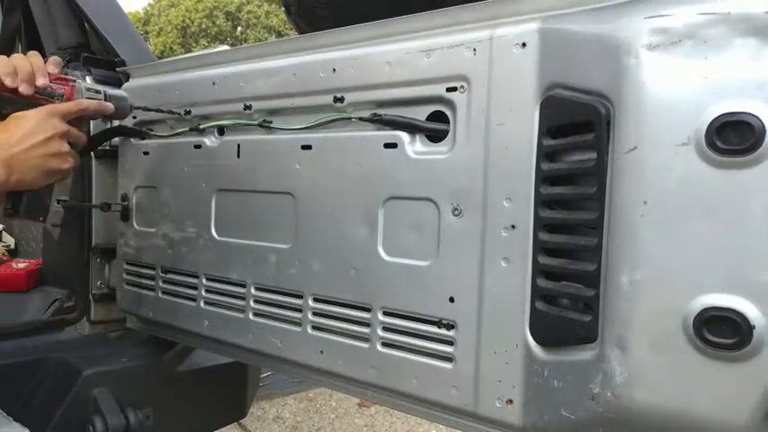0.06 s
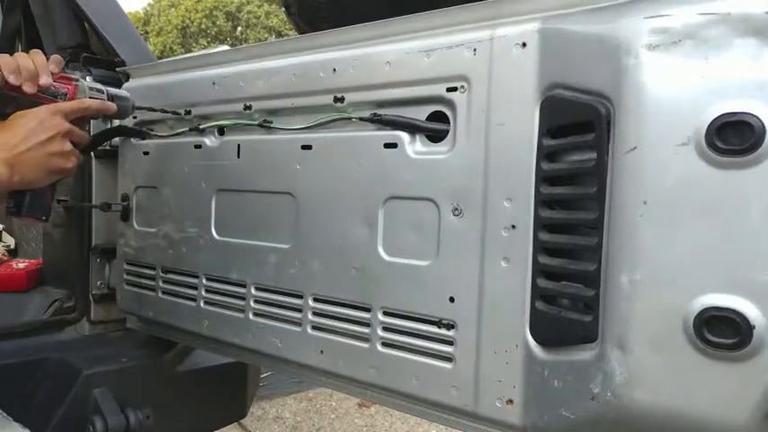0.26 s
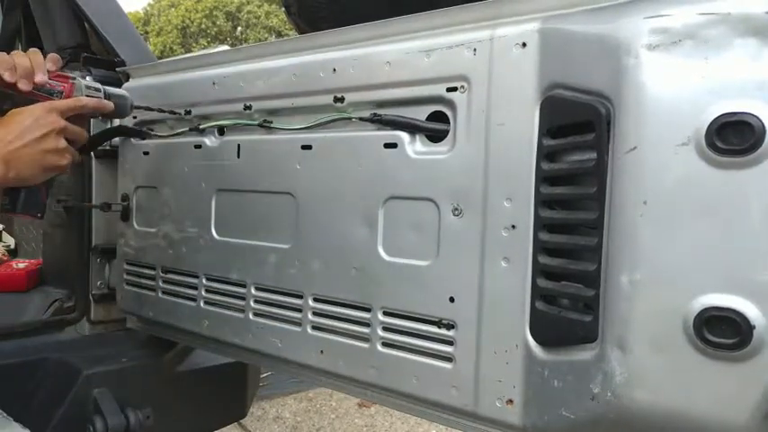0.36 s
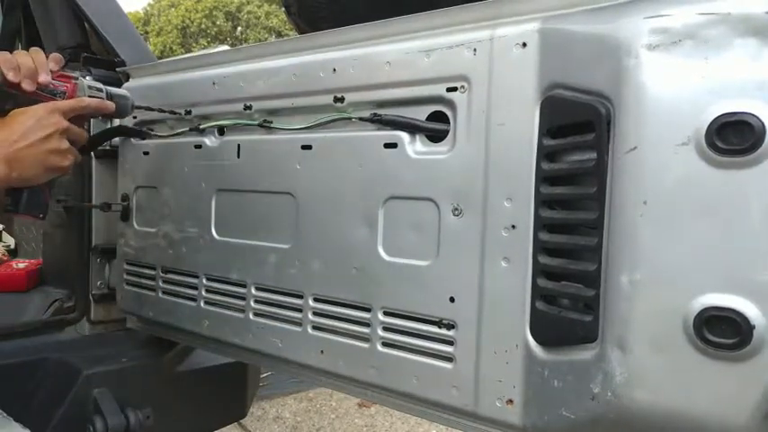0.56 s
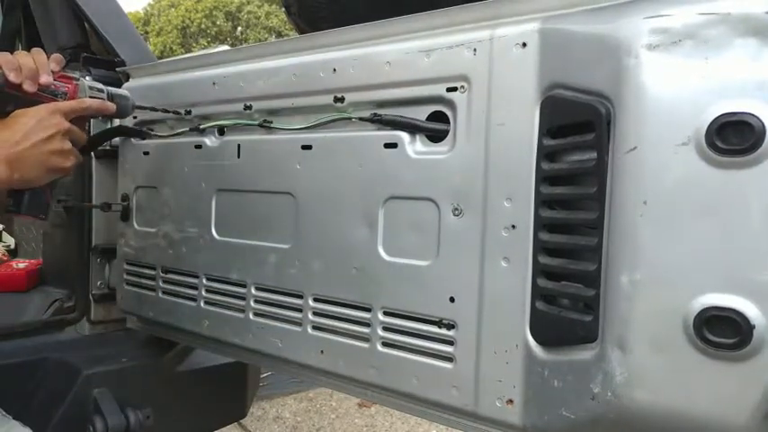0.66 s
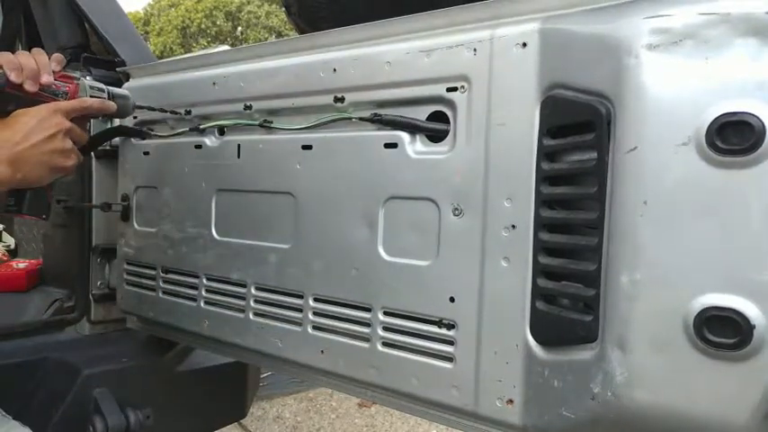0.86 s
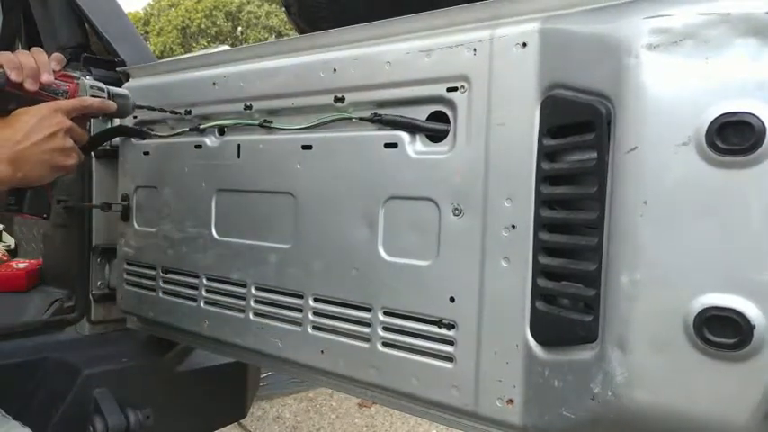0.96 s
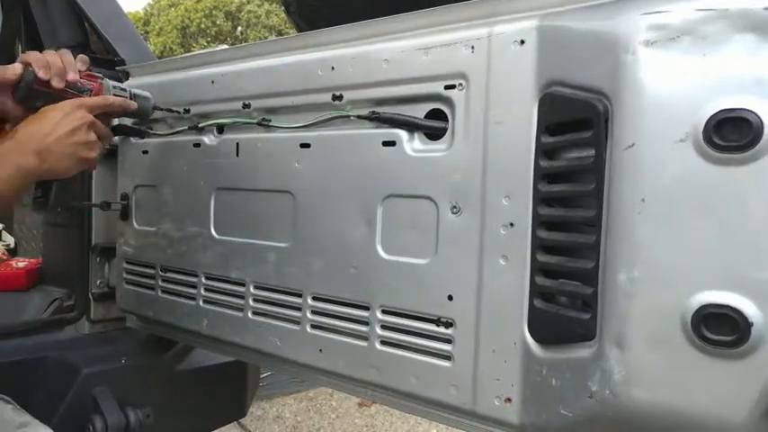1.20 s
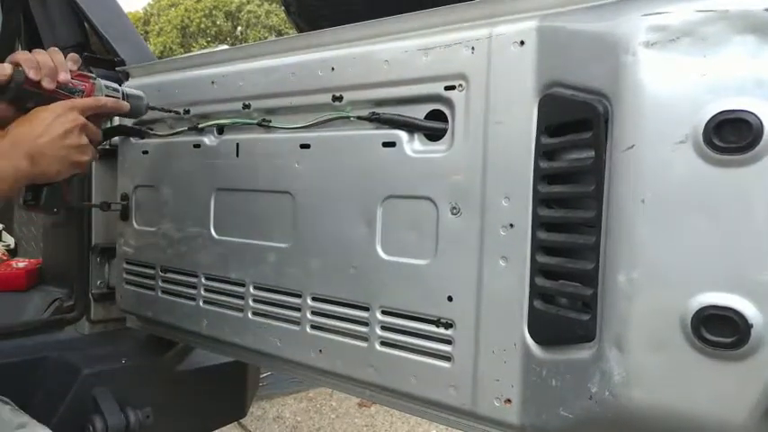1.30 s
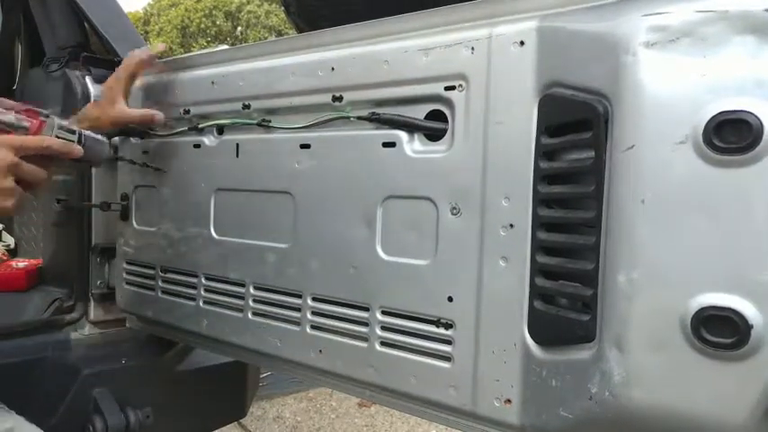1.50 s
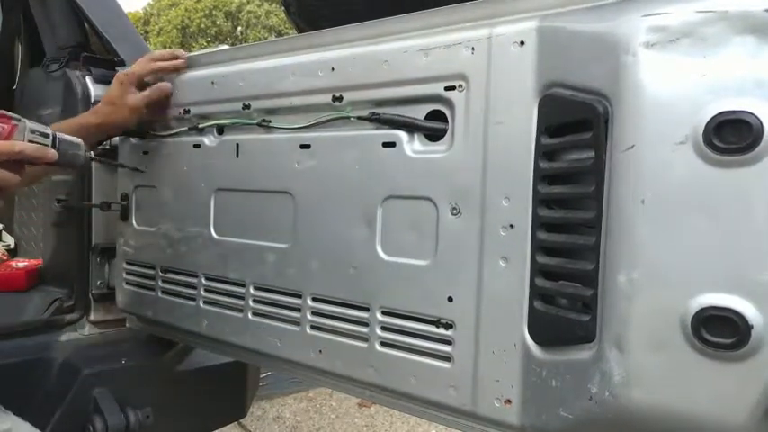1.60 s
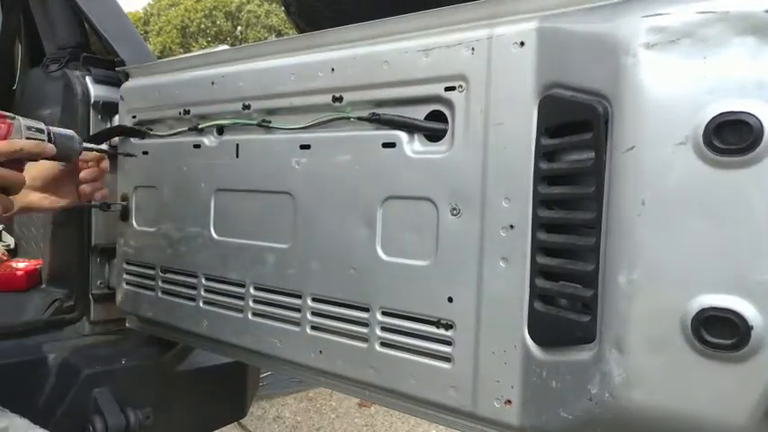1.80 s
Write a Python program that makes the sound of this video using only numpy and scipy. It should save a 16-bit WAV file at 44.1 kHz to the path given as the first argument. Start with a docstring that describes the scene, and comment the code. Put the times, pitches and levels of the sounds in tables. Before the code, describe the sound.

A cordless drill whirs in pulses, its bit scraping and biting harshly through sheet metal.

```python
"""A cordless drill works a small bit into a sheet-metal vehicle panel, over its motor's low rumble and hum.
The trigger pings and the motor whirs in pulses. The bit bites in short bursts, then in longer ones:
each chip it tears off is an impulse that rings the panel's modes. The loudest bites clip harshly,
and the bit squeals as it catches and breaks through. Last come light taps and pings,
and a dull knock as the tool is lowered."""
import sys
import numpy as np
from scipy import signal
from scipy.io import wavfile
from scipy.ndimage import uniform_filter1d

SR = 44100
rng = np.random.default_rng(int(sys.argv[2]) if len(sys.argv) > 2 else 0)


def wav_out(sig):
    """Save sig, one row per channel (or a flat mono array), as 16-bit PCM at SR to the path in sys.argv[1]."""
    wavfile.write(sys.argv[1], SR, np.round(np.clip(np.atleast_2d(sig).T, -1, 1) * 32767).astype(np.int16))


N = 81585
TIME = np.arange(N) / SR


def amp(db):
    """Amplitude ratio of a level in decibels."""
    return 10 ** (np.asarray(db) / 20)


def unit_rms(x):
    """Normalisation to unit mean power."""
    return x / np.sqrt(np.mean(x ** 2) + 1e-20)


def at_hz(points, hz):
    """Interpolation of (frequency, value) rows on a logarithmic frequency axis."""
    frequencies, values = np.transpose(points)
    return np.interp(np.log(hz), np.log(frequencies), values)


def drift(rate_hz):
    """Slow random fluctuation: low-passed noise of unit rms."""
    r = np.exp(-2 * np.pi * rate_hz / SR)
    return unit_rms(signal.lfilter([1], [1, -2 * r, r * r], rng.standard_normal(N + 8000))[8000:])


def gate(start, length, rise, fall):
    """Envelope with a quadratic rise, a hold and an exponential decay; all times in seconds."""
    age = TIME - start
    return np.clip(age / rise, 0, 1) ** 2 * np.exp(-np.clip(age - length, 0, 1) / fall)


def resonance(x, hz, width_hz):
    """Forced response of a damped oscillator, with unit gain at resonance."""
    r = np.exp(-np.pi * width_hz / SR)
    gain = (1 - r * r) / 2
    return signal.lfilter([gain, 0, -gain], [1, -2 * r * np.cos(2 * np.pi * hz / SR), r * r], x + 1e-18)


def narrow_noise(hz, width_hz):
    """Narrow-band noise, heard as a wavering tone."""
    return unit_rms(resonance(resonance(rng.standard_normal(N), hz, width_hz), hz, width_hz))


def butterworth(x, order, hz, kind):
    """Filtering with a maximally flat passband."""
    return signal.sosfilt(signal.butter(order, hz, kind, fs=SR, output="sos"), x)


def bands(low_hz, octaves):
    """Bands of constant relative width: the centre and edges of each in Hz."""
    edges = low_hz * 2 ** np.arange(0, np.log2(17000 / low_hz), octaves)
    return [(np.sqrt(low * high), [low, high]) for low, high in zip(edges, edges[1:])]


def stereo_noise(spectrum, correlation, flicker_db):
    """Partly coherent noise: in each band the balance of mid and side sets the left-right correlation."""
    total, white = 0, rng.standard_normal((2, 2, N))
    for k, (hz, edges) in enumerate(bands(66, octaves=0.5)):
        mid, side = butterworth(white[k % 2], 2, edges, "band")
        alike = np.clip(at_hz(correlation, hz), -1, 1)
        pair = np.sqrt(1 + alike) * mid + np.sqrt(1 - alike) * side * [[1], [-1]]
        total = total + amp(at_hz(spectrum, hz) + flicker_db * drift(35)) * pair
    return unit_rms(total)


# Swells of the motor's rumble. Each row: time in seconds, level in dB.
RUMBLE_LEVELS = [(0.0, -63.5), (0.164, -58), (0.21, -77), (0.282, -50.5), (0.318, -69), (0.35, -51.5),
                 (0.396, -59), (0.422, -78), (0.468, -52.5), (0.488, -67), (0.524, -48), (0.556, -67),
                 (0.582, -51), (0.612, -59), (0.632, -44), (0.654, -49.5), (0.788, -42.5), (0.854, -54),
                 (0.88, -43), (0.942, -60), (0.994, -50), (1.05, -45), (1.092, -48.5), (1.262, -42.5),
                 (1.276, -46.5), (1.308, -45), (1.354, -52), (1.374, -44.5), (1.472, -50), (1.504, -44.5),
                 (1.55, -54), (1.684, -57.5), (1.766, -50.5), (1.85, -56.5)]

def rumble_db():
    """Level contour of the rumble, piecewise linear in decibels."""
    times, levels = np.transpose(RUMBLE_LEVELS)
    return np.interp(TIME, times, levels)


# Colour of the rumble. Each row: frequency in Hz, relative spectral density in dB.
RUMBLE_SPECTRUM = [(60, -45.5), (120, -17.5), (170, -3.5), (300, 2.5), (480, -7.5), (650, -5),
                   (1200, -20.5), (5000, -29), (15000, -82)]
# Width of the rumble. Each row: frequency in Hz, left-right correlation.
RUMBLE_CORRELATION = [(100, 0.26), (300, 0.7), (700, 0.97)]

def rumble():
    """Amplitude-modulated noise: the motor's low rumble swells with its pulses over a faint background."""
    return amp(rumble_db()) * stereo_noise(RUMBLE_SPECTRUM, RUMBLE_CORRELATION, flicker_db=4.5)


# Low tones. Each row: start and length in seconds, frequency and bandwidth in Hz, base level in dB.
HUM_TONES = [(0, 0.62, 486, 27, -61), (0.123, 1, 355, 51, -62), (0.494, 0.36, 451, 23, -54.5),
             (0.745, 0.24, 455, 36, -47), (1.0, .3, 436, 36, -49), (.76, 0.16, 310, 40, -49.5),
             (1.04, 0.16, 291, 52, -47.5)]

def hum():
    """Common modulation: narrow bands of noise waver and swell with the rumble."""
    swing_db = rumble_db() - uniform_filter1d(rumble_db(), size=SR // 5)
    total = np.zeros(N)
    for start, length, hz, width_hz, db in HUM_TONES:
        waver_db = 2 * drift(rate_hz=3.2)
        envelope = amp(db + waver_db) * gate(start, length, rise=0.075, fall=0.09)
        total += envelope * narrow_noise(hz, width_hz)
    return amp(0.79 * swing_db) * total


def tones(rows, rise):
    """Damped vibration: sinusoids that rise, hold briefly and decay exponentially."""
    return sum(amp(db) * gate(start, length, rise, fall) * np.sin(2 * np.pi * hz * TIME)
               for start, length, hz, db, fall in rows)


# Partials of the knock. Each row: start and length in seconds, frequency in Hz,
# level before panning in dB, decay time in seconds.
KNOCK_PARTIALS = [(1.755, 0.0036, 310, -41, 0.0042), (1.758, 0.0023, 700, -35.5, 0.0013),
                  (1.759, 0.0013, 1200, -44.5, .0015), (1.783, 0.0023, 450, -42, 0.0034),
                  (1.79, .003, 520, -45.5, 0.0019)]

def knock():
    """Heavily damped low vibrations: a dull knock to the right as the tool is lowered."""
    pan_db = 9.5
    return tones(KNOCK_PARTIALS, rise=0.0027) * amp([[-pan_db], [pan_db]])


# Metal pings. Each row: start and length in seconds, frequency in Hz, level in dB, decay time in seconds.
PING_PARTIALS = [(.727, 0.0025, 5355, -12, 0.0014), (1.576, 0.001, 5770, -11.5, 0.0011),
                 (1.583, 0.0012, 6210, -10.5, 0.0011), (.036, 0.0025, 5530, -25, 0.0017),
                 (.036, 0.0013, 6200, -21, 0.00033), (.036, .003, 8350, -34.5, 0.0018),
                 (.036, 0.0032, 9600, -43, 0.00088), (1.736, 0.0014, 2600, -32, 0.0014),
                 (1.738, 0.0024, 1900, -43.5, .002), (1.737, 0.0018, 5500, -41, .003),
                 (1.823, 0.0024, 3700, -37, 0.0018), (1.824, 0.003, 2200, -35, .003),
                 (1.824, 0.0033, 5700, -39, .002), (1.828, 0.007, 3150, -36, 0.0026)]

def pings():
    """Free vibration of small metal parts: the trigger and chuck ring high and briefly."""
    return tones(PING_PARTIALS, rise=0.0007)


# Pulls of the trigger. Each row: start and length in seconds, opening and closing level in dB.
MOTOR_PULSES = [(0.047, 0.027, -64, -47.5), (0.12, 0.024, -42.5, -39), (0.241, 0.054, -33, -53),
                (0.323, 0.031, -40.5, -38), (.496, 0.032, -38, -40), (0.553, 0.035, -42.5, -37.5),
                (0.612, 0.039, -31, -41.5), (0.671, .038, -31, -38), (0.743, 0.088, -38.5, -30.5),
                (0.857, 0.11, -37.5, -25.5), (0.995, 0.12, -48.5, -28.5), (1.104, 0.076, -33, -60),
                (1.175, 0.04, -48.5, -63), (1.233, .100, -30, -28.5), (1.335, .105, -33.5, -33),
                (1.459, 0.085, -45, -49)]

def motor_envelope():
    """Superposed pulses of motor vibration, each a ramp in decibels."""
    envelope = np.zeros(N)
    for start, length, in_db, out_db in MOTOR_PULSES:
        progress = np.clip((TIME - start) / length, 0, 1)
        envelope += amp(in_db + (out_db - in_db) * progress) * gate(start, length, rise=0.011, fall=0.007)
    return envelope


# Colour of the whir. Each row: frequency in Hz, relative spectral density in dB.
WHIR_SPECTRUM = [(71, -66), (120, -25), (393, -21), (948, -2.5), (1290, -3.5), (2150, -15.5), (2750, 3),
                 (6100, -8), (7640, -9.5), (9960, -9), (13800, -9), (16000, -9.5)]
# Width of the whir. Each row: frequency in Hz, left-right correlation.
WHIR_CORRELATION = [(100, 0.43), (400, 1), (1300, 1), (4400, 1), (8000, 0.77), (15000, 0)]

def motor():
    """Machinery noise: a broadband whir of brushes and fan, with a narrow-band gear whine."""
    whine = amp(-10.5) * narrow_noise(hz=7750, width_hz=89)
    whir = stereo_noise(WHIR_SPECTRUM, WHIR_CORRELATION, flicker_db=-0.5)
    return motor_envelope() * (whir + whine)


# Squeals. Each row: start and length in seconds, frequency in Hz, level in dB, decay time in seconds.
SQUEAL_PARTIALS = [(1.251, 0.0068, 3565, -10, 0.0016), (1.264, 0.014, 1336, -9, 0.0056),
                   (1.270, 0.0036, 1800, -2.5, 0.0074), (1.274, 0.011, 873, -17.5, .008)]

def squeals():
    """Transient vibration: short tones as the bit catches and breaks through."""
    return tones(SQUEAL_PARTIALS, rise=0.0017)


# The bit grips the metal. Each row: start and length in seconds, opening and closing level in dB,
# opening and closing spectral tilt in dB per octave.
BIT_BITES = [(0.16, 0.013, -34, -24, -2, -3.5), (0.221, 0.021, -35, -12, 2, -2.5),
             (0.355, 0.027, -19, -19, 1.5, -3.5), (0.427, 0.026, -19, -16, 0, -4),
             (0.599, 0.027, -20.5, -15, 0.5, -4.5), (0.655, 0.027, -27, -13.5, -1, -2.5),
             (0.72, 0.0084, -13, -13, -6, 1.5), (0.731, 0.019, -10.5, -19, 0.5, -4),
             (0.775, 0.034, -23, -14.5, -2, -3.5), (0.835, 0.089, -17.5, -7.5, -2.5, -1),
             (0.967, 0.069, -12, -8.5, -2.5, -0.5), (1.034, .046, -7, -6, -1.5, -3),
             (1.120, 0.1433, -9.5, -7, -1, -2.5), (1.261, .022, -16, -14.5, -3, -9.5),
             (1.361, 0.05, -3, -6.5, -5, -2), (1.414, 0.05, -15, -14, 3.5, 2.5),
             (1.462, 0.043, -10.5, -7, 1.5, 3), (1.504, 0.038, -6, -13.5, 2, -3.5),
             (1.57, 0.012, -29, -22.5, 10, 3)]
# The tool taps the panel. Each row: start in seconds, level in dB, spectral tilt in dB per octave.
TOOL_TAPS = [(0.045, -45, 10.5), (0.066, -57.5, -11), (1.719, -46.5, -3), (1.732, -40, 1),
             (1.784, -53, -10), (1.805, -47, -6), (1.821, -32.5, 1), (1.830, -45, -2)]
MOTOR_COUPLING_DB, CHATTER_DB, TAP_S = -11.5, 0.5, 0.0025

def excitation():
    """Superposition of bites, motor vibration and taps: the force envelope and its spectral tilt."""
    force, tilt = np.zeros(N), np.zeros(N)
    for start, length, in_db, out_db, in_tilt, out_tilt in BIT_BITES:
        progress = np.clip((TIME - start) / length, 0, 1)
        force += amp(in_db + (out_db - in_db) * progress) * gate(start, length, rise=0.0069, fall=0.0047)
        tilt = np.where(TIME >= start, in_tilt + (out_tilt - in_tilt) * progress, tilt)
    force += amp(MOTOR_COUPLING_DB) * motor_envelope()
    force *= amp(CHATTER_DB * drift(rate_hz=120))
    for start, db, tap_tilt in TOOL_TAPS:
        force += amp(db) * gate(start, TAP_S, rise=0.00031, fall=0.00034)
        tilt[int(start * SR):int((start + 4 * TAP_S) * SR)] = tap_tilt
    return force, tilt


def tilt_gain(tilt, hz, pivot_hz=3000):
    """Gain at one frequency of a spectral slope in dB per octave."""
    return amp(tilt * np.log2(hz / pivot_hz))


def chip_impulses(per_second=4000, spread_db=3):
    """Shot noise: chips tear off at random instants with random strengths."""
    torn = rng.random(N) < per_second / SR
    return unit_rms(torn * amp(spread_db * np.minimum(rng.exponential(1, N), 4)))


def sizzle(force, above_hz):
    """Nonlinear growth: treble noise follows the cube of the force, so it marks the hardest cutting."""
    noise = uniform_filter1d(force, size=200) ** 3 * rng.standard_normal(N)
    return butterworth(noise, 4, above_hz, "high")


# The panel's dense weak modes. Each row: frequency in Hz, relative spectral density in dB.
DENSE_SPECTRUM = [(290, -53), (500, -40), (1090, -34.5), (1480, -2), (1920, -26), (2100, -13.5),
                  (2550, -7.5), (3220, -4.5), (4060, -14.5), (5470, -12.5), (7090, -22.5), (9540, -27.5),
                  (11000, -56), (14300, -75.5), (22000, -120)]

def dense_modes(impacts, tilt, t60_s=0.13):
    """Modal overlap: crowded modes merge into noise whose energy decays exponentially after each impact."""
    retained = 10 ** (-6 / (t60_s * SR))   # share of energy kept per sample
    envelope = np.sqrt(signal.lfilter([1 - retained], [1, -retained], impacts ** 2))
    steady, driven = np.zeros(N), np.zeros(N)
    for hz, edges in bands(600, octaves=0.25)[:17]:
        band = amp(at_hz(DENSE_SPECTRUM, hz)) * butterworth(rng.standard_normal(N), 2, edges, "band")
        steady += band
        driven += band * envelope * tilt_gain(tilt, hz)
    return driven / np.std(steady)


# The panel's distinct resonances. Each row: frequency in Hz, bandwidth in Hz, relative level in dB.
PANEL_MODES = [(745, 41, -20.5), (907, 40, -17), (1013, 61, -26), (1197, 22, -11.5), (1328.6, 46, -8),
               (1395, 22, 0.5), (1530, 36, -6), (1754, 35, -22), (1857, 48, -5.5), (2020, 20, -11.5),
               (2280, 38, -8.5), (2472, 36, -2), (2645, 31, 1.5), (2741, 120, -4), (2912, 49.3, 3),
               (3171, 92, 2), (3308, 55, 0), (3655, 120, -5.5), (3816, 240, -9.5), (4379, 127, -4.5),
               (4810, 60, -19.5), (5272, 110, -1.5), (5400, 39, 2.5), (5606, 86, -1), (5650, 130, -9.5),
               (6126, 200, -6), (6270, 250, -12.5), (7774, 180, -14), (8530, 100, -15.5),
               (9140, 450, -18.5), (9586, 150, -14.5)]

def distinct_modes(force, chips, tilt):
    """Modal superposition: each chip drives every resonance with its own random strength."""
    steady, driven = np.zeros(N), np.zeros(N)
    for hz, width_hz, db in PANEL_MODES:
        shake = amp(db) * resonance(chips * rng.standard_normal(N), hz, 4 * width_hz)
        steady += resonance(shake, hz, width_hz)
        driven += resonance(shake * force * tilt_gain(tilt, hz), hz, width_hz)
    return driven / np.std(steady)   # a constant unit force with no tilt gives unit rms


def panel(crossover_hz=9750):
    """Forced vibration of a thin plate: modes ring below the crossover, and the cut sizzles above it."""
    force, tilt = excitation()
    chips = chip_impulses()
    ringing = distinct_modes(force, chips, tilt) + amp(-8.5) * dense_modes(force * chips, tilt)
    return butterworth(ringing, 8, crossover_hz, "low") + amp(-16.5) * sizzle(force, crossover_hz)


def scene():
    """Linear superposition: panel and hum in the centre, motor and rumble wide, the knock to the right."""
    centre = panel() + pings() + squeals() + hum()
    return centre + motor() + rumble() + knock()


def record(dry, bass_hz=142, clip_db=-0.5, cutoff_hz=16100):
    """Band limiting and hard clipping: the deep bass is dropped, peaks are flattened, the top is cut."""
    ceiling = amp(clip_db)
    clipped = np.clip(butterworth(dry, 2, bass_hz, "high"), -ceiling, ceiling)
    return signal.sosfilt(signal.ellip(12, 0.3, 45, cutoff_hz, fs=SR, output="sos"), clipped)


dry = scene()
out = record(dry)
wav_out(out)
```